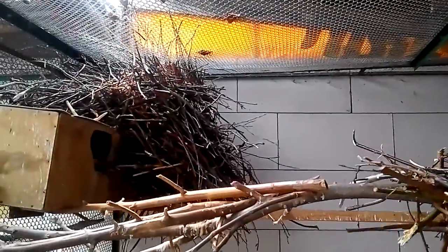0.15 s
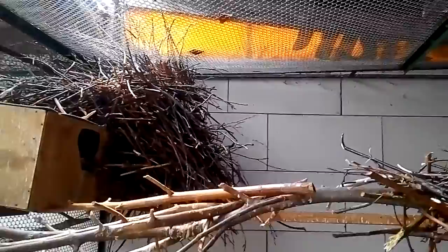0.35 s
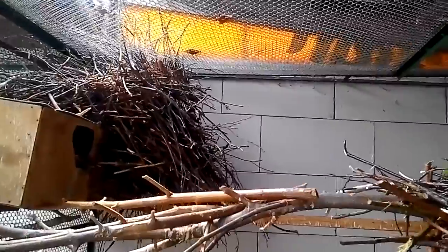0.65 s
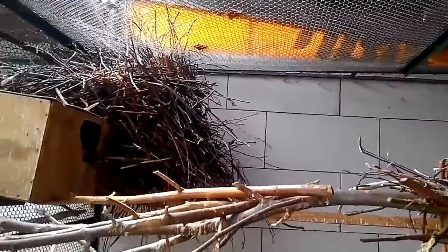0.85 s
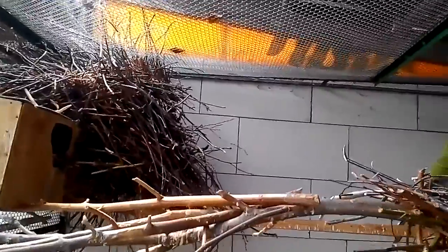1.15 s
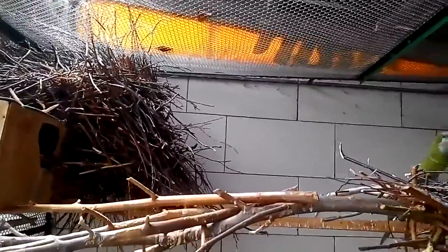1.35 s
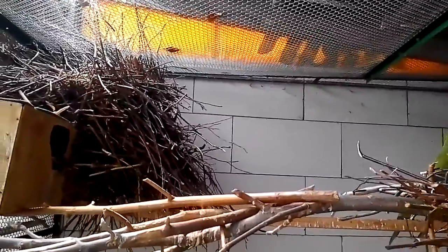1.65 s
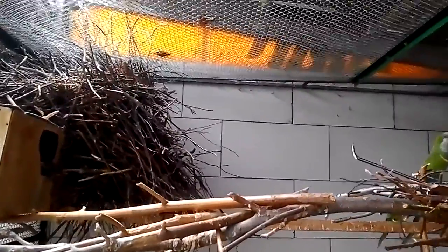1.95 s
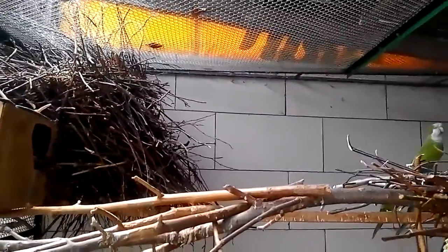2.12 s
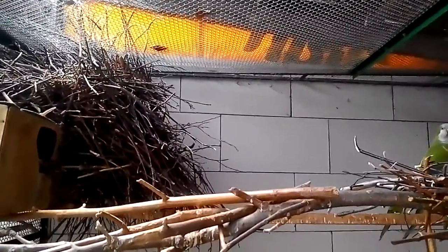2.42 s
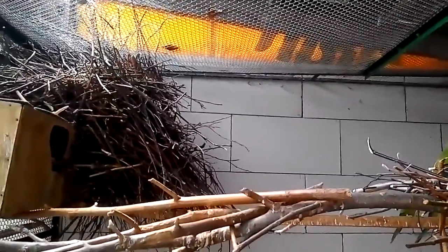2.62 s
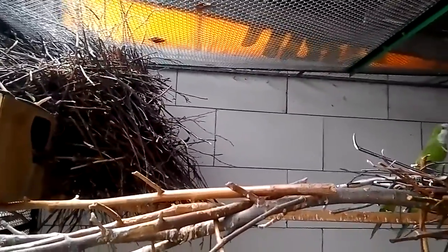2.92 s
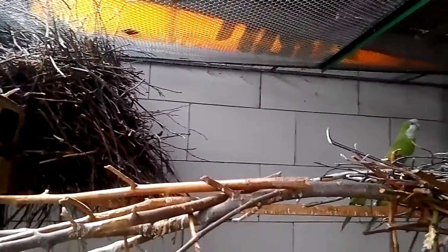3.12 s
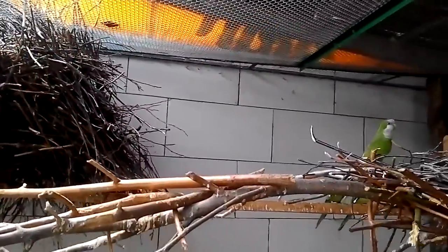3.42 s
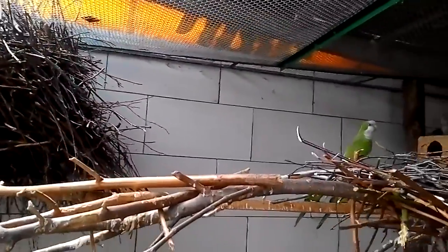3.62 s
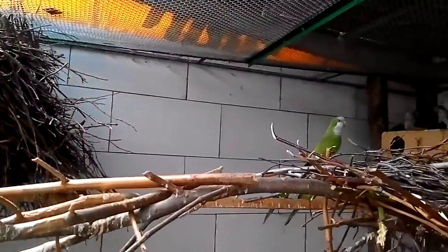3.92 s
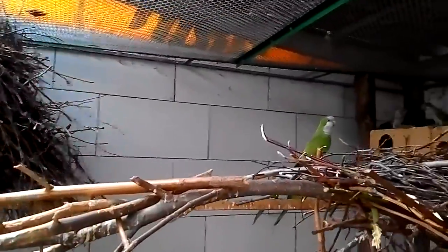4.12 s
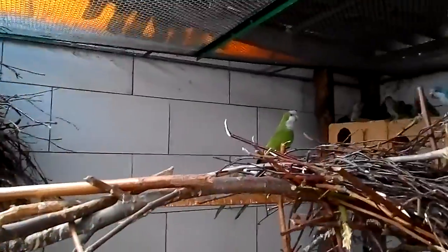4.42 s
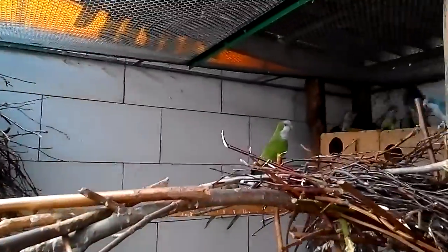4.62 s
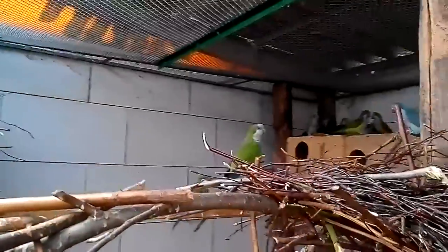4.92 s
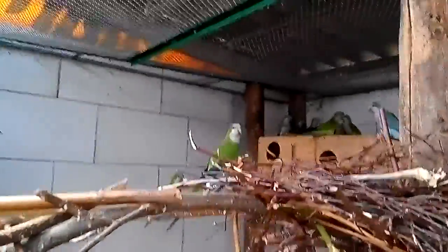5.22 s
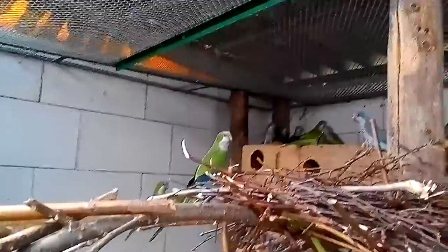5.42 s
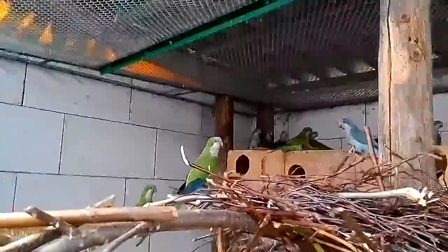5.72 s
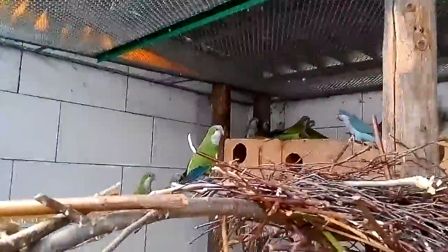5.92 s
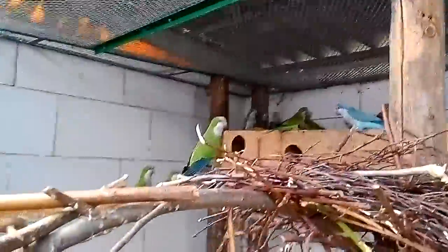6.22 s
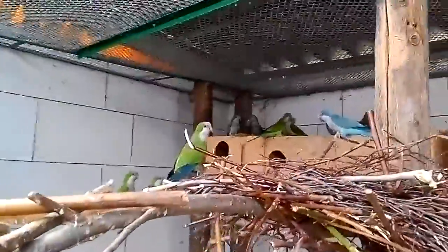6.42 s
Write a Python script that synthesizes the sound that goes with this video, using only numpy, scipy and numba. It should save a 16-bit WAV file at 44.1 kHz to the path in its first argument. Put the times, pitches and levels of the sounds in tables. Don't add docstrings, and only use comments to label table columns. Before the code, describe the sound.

A flock of parakeets calls almost continuously a few metres from a phone in a brick and mesh aviary. Low, middle and higher nasal squawks overlap, each chopped into a fast rattling throb. Tiny whistled peeps and short shrieks poke through, claws scuff hollow nest boxes softly, and a faint outdoor hum lies beneath. The loudest calls distort slightly, and the end grows quieter.

```python
import sys
import numpy as np
from scipy import signal
from scipy.fft import rfft, irfft
from scipy.io import wavfile
from scipy.ndimage import uniform_filter1d
from numba import njit

SR = 44100
rng = np.random.default_rng(int(sys.argv[2]) if len(sys.argv) > 2 else 0)


def attenuation_scalar(level_db):
    decades = np.asarray(level_db, float) / 20
    return 10 ** decades


def dump(signal):
    limited = np.clip(np.atleast_2d(signal).T, -1, 1)
    pcm = np.round(limited * 32767).astype(np.int16)
    wavfile.write(sys.argv[1], SR, pcm)


N = 289296

# pitch_hz, level_db (per Hz)
HUM_COLOUR = [(20, -10.5), (60, -12), (300, -10.5), (480, 1), (2200, 4), (6500, -0.5), (9000, -9),
              (15000, -43)]
# start_s, ring_hz, level_db, t60_s
KNOCKS = [(0.956, 352, -41, 0.51), (1.614, 234, -47, 0.29), (1.629, 440, -44, 0.45), (1.76, 458, -34, 0.12),
          (2.289, 462, -42.5, 1), (2.299, 154, -47, 0.33), (2.451, 494, -48.5, 0.74), (3.051, 448, -48, 1),
          (4.172, 223, -31, 0.16), (4.2, 248, -42, 0.72), (4.55, 208, -51, 1), (6.009, 177, -49, 0.62)]
# start_s, length_s, from_hz, to_hz, level_db
PEEPS = [(0.062, 0.019, 3420, 3770, -24), (2.343, 0.014, 3960, 4360, -22),
         (2.408, 0.022, 4480, 4650, -19.5), (2.453, 0.016, 12300, 11900, -73),
         (2.477, 0.027, 4720, 4630, -22), (3.725, 0.053, 5370, 5320, -31), (3.73, .03, 6000, 6100, -32),
         (4.523, 0.074, 1106, 1030, -31), (5.385, 0.036, 4980, 4690, -25),
         (5.831, 0.0525, 2084, 2515, -30.5), (5.834, 0.045, 4020, 5400, -26)]
# start_s, loudest_s, end_s, level_db, pitch_hz (at the loudest moment)
CLEAR_CALLS = [
    (1.363, 1.568, 1.595, -19, 769),
    (1.857, 2.03, 2.253, -19, 796.3),
]
STEADY_CALLS = [
    (.712, 0.938, 1.039, -22.5, 800),
    (3.217, 3.452, 3.57, -17, 927),
    (5.441, 5.618, 5.75, -22, 873),
]
RISING_CALLS = [
    (.047, 0.067, 0.09, -25.5, 930),
    (2.485, 2.575, 2.64, -30.5, 736),
    (3.757, 4.002, 4.2, -25.5, 875.6),
    (5.886, 6.05, 6.1, -28.5, 758.5),
]
LOW_CALLS = [
    (0.084, 0.328, .63, -23.5, 628.7),
    (0.74, 0.926, 1.06, -20.5, 634),
    (1.095, 1.333, 1.37, -30, 711),
    (1.58, 1.603, 1.67, -33, 729),
    (1.721, 1.814, 1.885, -20, 631),
    (3.198, 3.329, 3.63, -20, 637),
    (4.597, 4.664, 4.72, -19.5, 601),
    (4.696, 4.804, 4.91, -19.5, 605),
    (5.105, 5.191, 5.32, -29, 633.5),
    (5.341, 5.401, 5.62, -22, 624),
]
MIDDLE_CALLS = [(0.199, 0.353, .47, -24, 819), (1.713, 1.833, 1.86, -24.5, 835),
                (2.509, 2.698, 2.82, -18.5, 788), (2.581, 2.749, 2.82, -18, 902.5),
                (2.852, 3.001, 3.02, -18.5, 792), (2.86, 2.958, 3.02, -17.5, 902.6),
                (3.299, 3.505, 3.64, -23, 758.4), (3.801, 4.199, 4.25, -19, 798.6),
                (3.952, 4.198, 4.24, -20, 906.4), (4.392, 4.503, 4.64, -25.5, 736),
                (5.131, 5.257, 5.31, -26.5, 818), (5.451, 5.659, 5.78, -22, 709),
                (5.886, 6.119, 6.56, -30.5, 736)]
SHRILL_CALLS = [
    (2.002, 2.13, 2.2, -17, 1044),
    (4.287, 4.35, 4.385, -18.5, 1123),
    (4.491, 4.534, 4.6, -34, 1043),
    (4.745, 4.765, 4.85, -24, 1040),
    (4.973, 5.005, 5.035, -20.5, 1130),
]
DRONE_CALLS = [
    (6.049, 6.169, 6.56, -24.5, 619),
]
# throb_hz, depth (0-1), pitch_rise (share), swell_db, fade_db
VOICE = [(33.27, 0.97, .06, 4.5, 7), (34.6, .85, .09, 12, 4), (32.55, 0.79, 0.25, 10.5, 8),
         (33.29, .6, .05, 11.5, 5.5), (37.09, .6, .12, 13, 3), (38.36, 0.5, .1, 8, 7),
         (34.42, 0.76, .02, 7.5, -1)]
REED = [(.08, .13, 0), (.12, .1, -.045), (.13, .1, -.02), (.32, .08, .05), (.28, .08, .02), (.24, .08, .06),
        (.15, .07, .01)]
# first_hz, second_db, third_db, fourth_db
THROAT = [(2104, -0.5, 1, -7.5), (2490, 4.5, 5, -1), (2360, 2.5, 3, -2), (2423, 3, 3, -3.5),
          (2440, 3.5, 4, -3), (2564, 7, 6.5, -0.5), (2290, 1.5, 0, -1)]
# centre_hz, width_hz
UPPER = [(4400, 1440), (6300, 810), (9300, 1420)]
# centre_hz, width_hz, level_db
CHEST = (1196, 930, -23)
# centre_hz, width_hz, level_db
AIR = (13000, 5900, -37)

TOP_HZ = 15650
HUM_DB, OVERTONE_DB = -44, -12
WALL_T60_S, WALL_DB, WALL_DAMP_HZ, WALL_GAP_S = .36, -9, 5800, 0.0038
ATTACK_S, RELEASE_S, RELEASE_DB = 0.0063, 0.0887, 33.5
BEAK_PER_DB, DULL_PER_DB, ROUGH_PER_DB = .011, 0.2, .012
FIRST_WIDTH_HZ, BEAK_MID_HZ, BEAK_TOP_HZ = 1210, 2350, 10500
BEAK_FOLLOW, BEAK_WANDER, FLICKER_DB = .4, .032, 2.5
OPEN_SHARE, THROB_SCATTER_DB, THROB_DETUNE = .63, 1.3, .018
PIPE_HZ, LOCK_DB, LOCK_ROUGH = 2500, -15, .16
JITTER, SHIMMER, BREATH_DB, VEIL_HZ = .15, 1.4, 1, 5200
DRIVE_DB, SQUEEZE = 4.5, .55
LONGEST = 33000


def level(x, db):
    return x * attenuation_scalar(db) / np.sqrt(np.mean(x ** 2))


def chance(count):
    return rng.standard_normal(max(count, LONGEST))[:count]


def walk(rate, count):
    k = max(int(SR / rate), 2)
    noise = chance(max(count, LONGEST))
    smooth = uniform_filter1d(uniform_filter1d(noise, k), k)
    return smooth[:count] * np.sqrt(1.5 * k)


def hum():
    hz, db = np.transpose(HUM_COLOUR)
    bins = np.log(np.fft.rfftfreq(N, 1 / SR) + 1)
    colour = attenuation_scalar(np.interp(bins, np.log(hz), db))
    air = irfft(rfft(rng.standard_normal(N)) * colour, N)
    return level(air, HUM_DB) * attenuation_scalar(0.28 * walk(14, N))


def walls(x):
    t = np.arange(int(.6 * SR)) / SR
    noise = rng.standard_normal(len(t)) * (t > WALL_GAP_S)
    low = signal.sosfilt(signal.butter(1, WALL_DAMP_HZ, fs=SR, output="sos"), noise)
    tail = low * attenuation_scalar(-60 * t / WALL_T60_S) + (noise - low) * attenuation_scalar(-120 * t / WALL_T60_S)
    tail = tail * attenuation_scalar(WALL_DB) / np.sqrt(np.sum(tail ** 2))
    return signal.fftconvolve(x, tail)[:N]


def knocks():
    out, t = np.zeros(N), np.arange(SR // 2) / SR
    for start, hz, db, t60 in KNOCKS:
        phase = 2 * np.pi * np.cumsum(hz * (1 + 0.1204 * walk(38, len(t)))) / SR
        scuff = (0.3 + 0.63 * walk(67, len(t))) * np.minimum(t / 0.012, 1)
        out[int(start * SR):][:len(t)] += attenuation_scalar(db - 60 * t / t60) * scuff * np.sin(phase)
    return out


def peeps():
    out = np.zeros(N)
    for start, length, from_hz, to_hz, db in PEEPS:
        x = np.linspace(0, 1, int(length * SR))
        glide = to_hz + (from_hz - to_hz) * np.exp(-x / .3)
        phase = 2 * np.pi * np.cumsum(glide * (1 + .03 * walk(400, len(x)))) / SR
        overtones = np.sin(2 * phase) + 0.076 * np.sin(3 * phase)
        tone = np.sin(phase) + attenuation_scalar(OVERTONE_DB) * overtones * (to_hz < TOP_HZ / 2)
        tone = tone + attenuation_scalar(-33.0) * np.diff(chance(len(x) + 1))
        shape = np.minimum(np.minimum(x / 0.041, (1 - x) / 0.34), 1)
        out[int(start * SR):][:len(x)] += attenuation_scalar(db) * tone * shape
    return out


def effort(t, start, top, end, swell_db, fade_db):
    swell = np.clip((top - t) / (top - start), 0, 1) ** 1.5
    fade = np.clip((t - top) / max(end - top, .001), 0, 1)
    release = np.clip(t - end, 0, 1) / RELEASE_S
    return -swell_db * swell - fade_db * fade - RELEASE_DB * release


def squawk(hz, throb_hz, depth, rough, droop):
    size = len(hz)
    depth, rough = np.clip(depth, 0, 1), np.clip(rough, 0, 1)
    count, throb = np.divmod(np.cumsum(throb_hz * (1 + .015 * walk(30, size))) / SR, 1)
    strength, detune = rng.standard_normal((64, 2))[count.astype(int)].T
    gate = np.clip(np.minimum(throb / .04, (OPEN_SHARE + .22 - throb) / .25), 0, 1)
    hz = hz * (1 + depth * (droop * (np.exp(-throb / .3) - .3) + THROB_DETUNE * detune))
    hz = hz * (1 + JITTER * rough * walk(350, size))
    phase = 2 * np.pi * np.cumsum(hz) / SR
    step = max(round(PIPE_HZ / hz.mean()), 1)
    off = attenuation_scalar(LOCK_DB * np.clip(1.5 - 1.5 * rough / LOCK_ROUGH, 0, 1))
    tone = np.zeros(size)
    for k in range(1, 26):
        veil = 1 + depth * (k * hz / VEIL_HZ) ** 4
        weight = (k * hz < TOP_HZ) * (off if k % step else 1) / veil
        tone += weight * np.cos(k * phase + k * k)
    tone = tone * np.sqrt(hz / TOP_HZ * 2 / (off ** 2 + (1 - off ** 2) / step))
    hiss = signal.lfilter([1, -.6], 1, chance(size))
    breath = attenuation_scalar(BREATH_DB) * np.sqrt(rough + .06) * hiss
    tone = tone * (1 + SHIMMER * rough * walk(1100, size)) + breath
    return tone * (1 - depth + depth * gate) * attenuation_scalar(THROB_SCATTER_DB * depth * strength)


@njit
def svf(x, hz, width):
    y, b, l = np.empty(len(x)), 0., 0.
    for i in range(len(x)):
        g, k = np.tan(np.pi * hz[i] / SR), width / hz[i]
        v = (b + g * (x[i] - l)) / (1 + g * (g + k))
        b, l, y[i] = 2 * v - b, l + 2 * g * v, k * v
    return y


def resonance(x, hz, width_hz):
    hz = hz + np.zeros(len(x))
    once = svf(x, hz, 1. * width_hz)
    return svf(once, hz, 1. * width_hz)


def throat(reed, push_db, first_hz, *upper_db):
    def ring(hz, width_hz):
        return resonance(reed, hz, width_hz) * np.sqrt(TOP_HZ / width_hz)

    count = len(reed)
    first_hz = first_hz * (1 + BEAK_PER_DB * push_db)
    opening = (first_hz / BEAK_MID_HZ) ** BEAK_FOLLOW
    out = ring(first_hz, FIRST_WIDTH_HZ)
    for (hz, width_hz), rel_db in zip(UPPER, upper_db):
        centre = hz * opening * (1 + BEAK_WANDER * walk(16.0, count))
        bright_db = rel_db + DULL_PER_DB * push_db + FLICKER_DB * walk(18.4, count)
        out = out + attenuation_scalar(bright_db) * ring(centre, width_hz)
    out = signal.sosfilt(signal.butter(4, BEAK_TOP_HZ, fs=SR, output="sos"), out)
    chest_hz, chest_width_hz, chest_db = CHEST
    out = out + attenuation_scalar(chest_db + 2 * FLICKER_DB * walk(16, count)) * ring(chest_hz, chest_width_hz)
    air_hz, air_width_hz, air_db = AIR
    return out + attenuation_scalar(upper_db[2] + air_db + 9) * ring(air_hz, air_width_hz)


def flock():
    out = np.zeros(N)
    birds = (CLEAR_CALLS, STEADY_CALLS, RISING_CALLS, LOW_CALLS, MIDDLE_CALLS, SHRILL_CALLS, DRONE_CALLS)
    for calls, voice, (rough, droop, sag), shape in zip(birds, VOICE, REED, THROAT):
        throb_hz, depth, rise, swell_db, fade_db = voice
        for start, top, end, db, hz in calls:
            first = int(start * SR)
            t = np.arange(first, min(int((end + RELEASE_S) * SR), N)) / SR
            effort_db = effort(t, start, top, end, swell_db, fade_db)
            push_db = np.maximum(effort_db, -15)
            before = np.clip((top - t) / (top - start), 0, 1)
            after = np.clip((t - top) / (end - top), 0, 2)
            pitch = hz * (1 - rise * before - sag * after)
            call_rough = rough - ROUGH_PER_DB * np.minimum(push_db + 3, 0)
            reed = squawk(pitch, throb_hz, depth, call_rough, droop)
            attack = np.minimum((t - t[0]) / ATTACK_S, 1)
            out[first:first + len(t)] += throat(reed, push_db, *shape) * attenuation_scalar(db + effort_db) * attack
    return out


def scene():
    birds = flock() + peeps()
    return (birds + walls(birds) + knocks() + hum())[None]


def roll_off(x):
    return signal.sosfilt(signal.butter(12, 15690, fs=SR, output="sos"), x)


def record(dry):
    squeezed = np.tanh(SQUEEZE * dry * attenuation_scalar(DRIVE_DB)) / SQUEEZE
    clipped = np.clip(squeezed, -1, 1)
    mix = signal.sosfilt(signal.ellip(8, .2, 65, TOP_HZ, fs=SR, output="sos"), clipped)
    return roll_off(mix)


dry = scene()
out = record(dry)
dump(out)
```